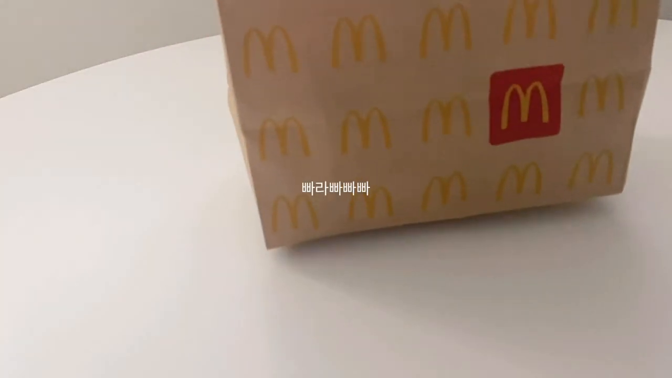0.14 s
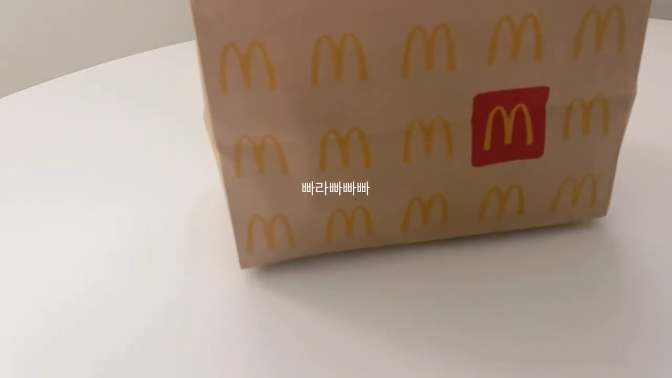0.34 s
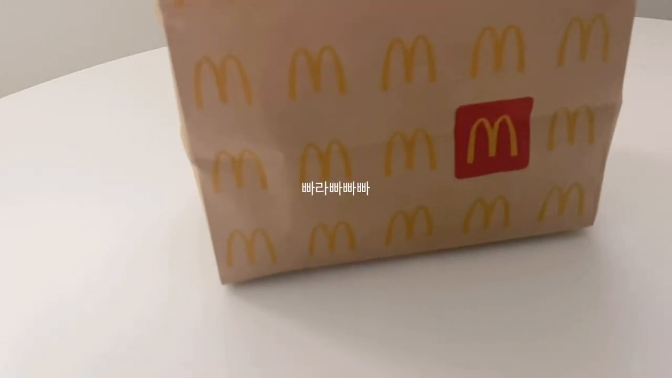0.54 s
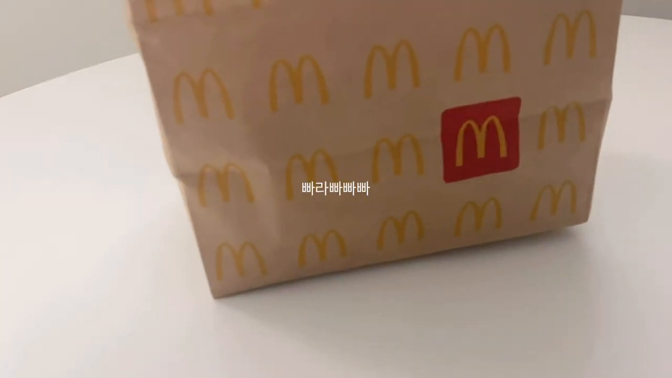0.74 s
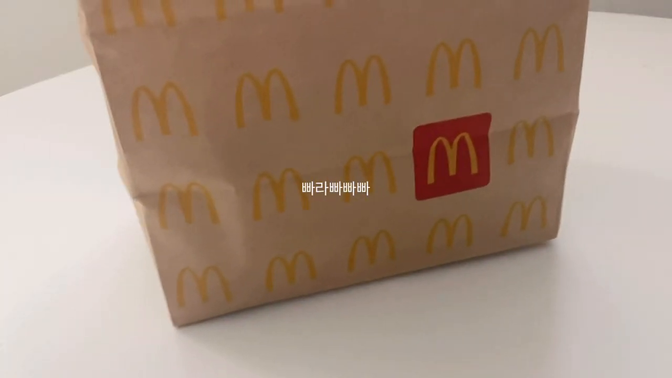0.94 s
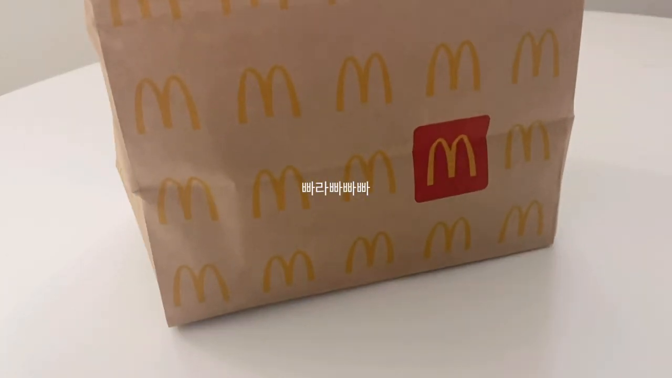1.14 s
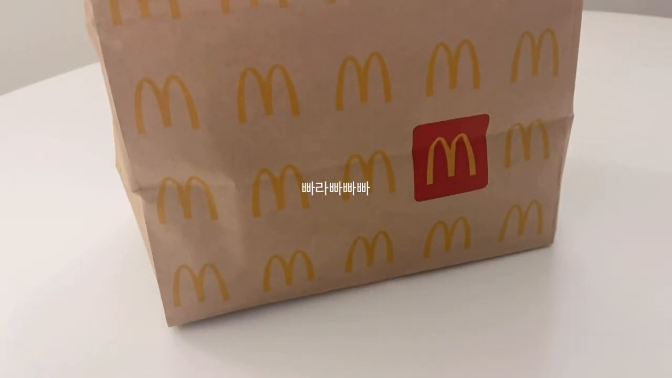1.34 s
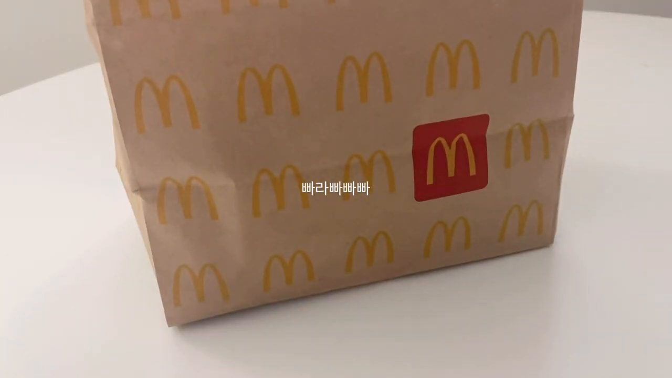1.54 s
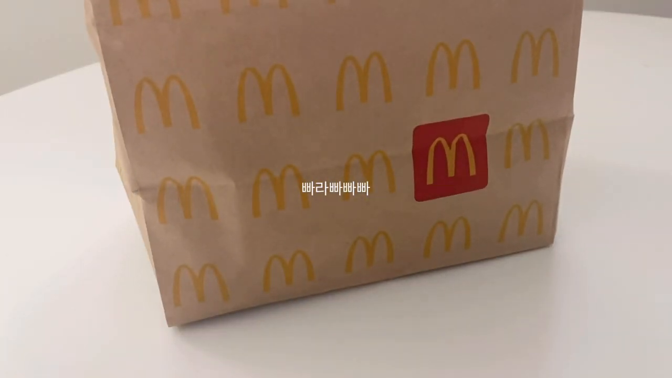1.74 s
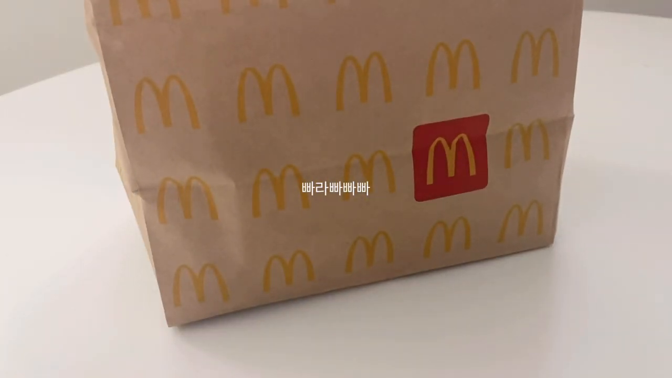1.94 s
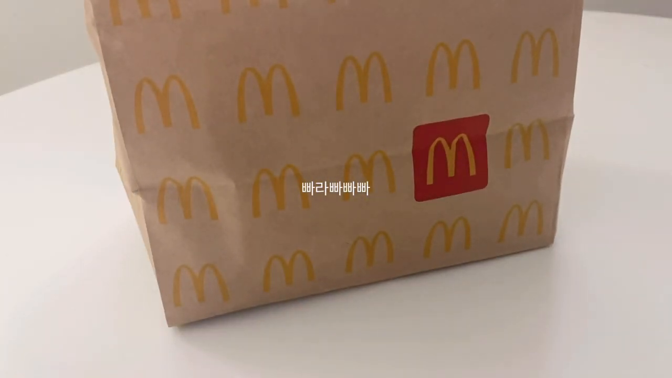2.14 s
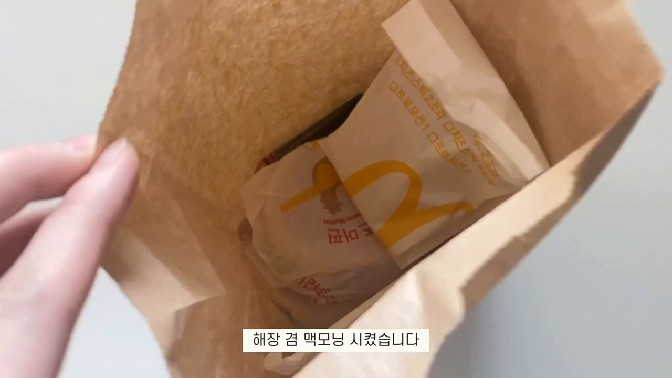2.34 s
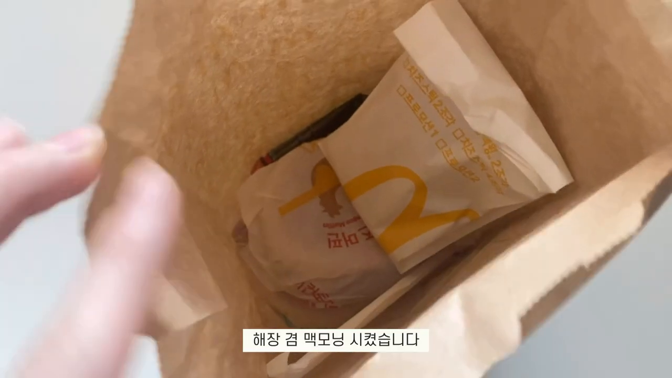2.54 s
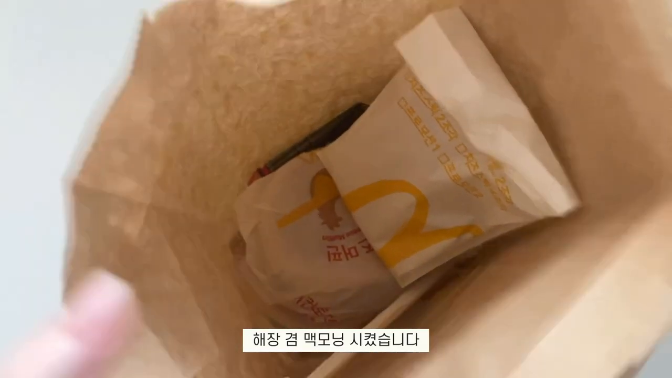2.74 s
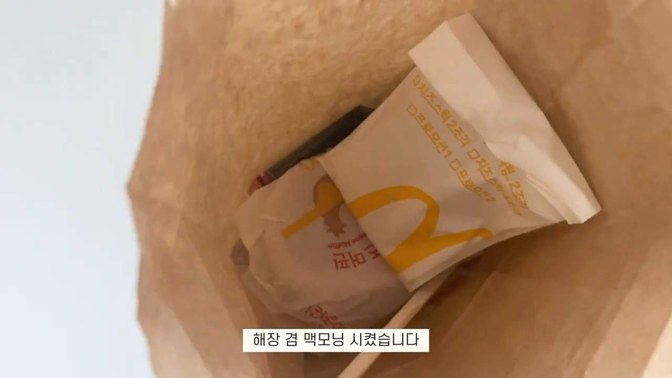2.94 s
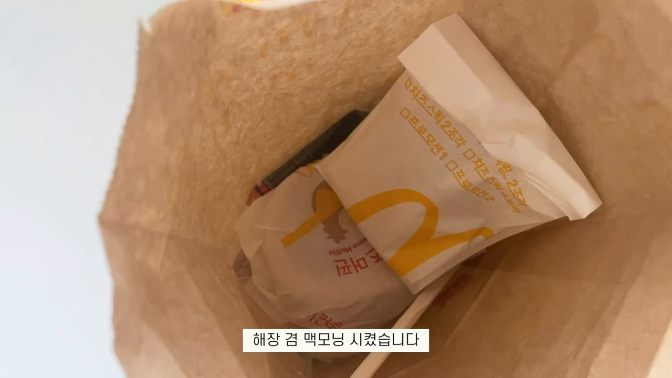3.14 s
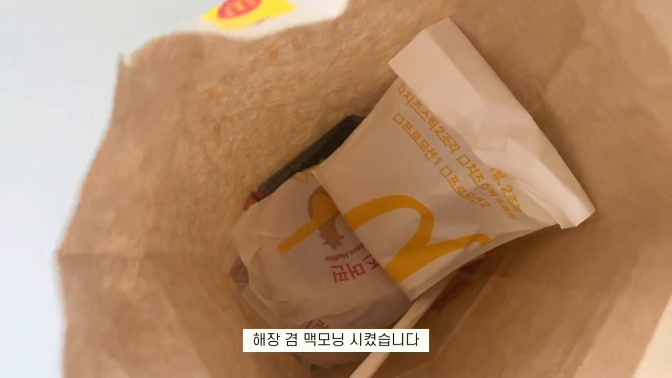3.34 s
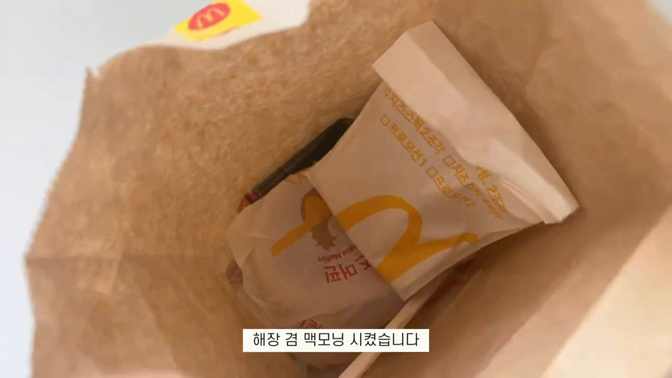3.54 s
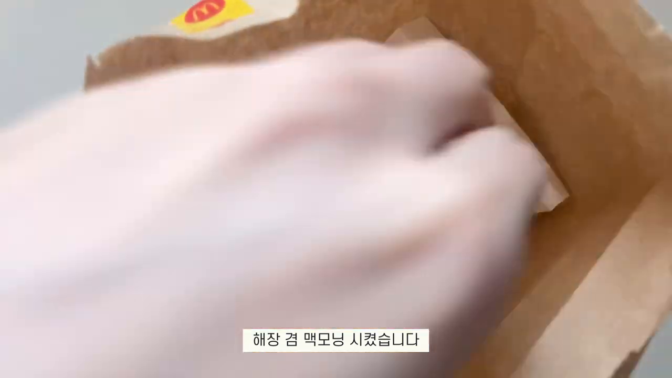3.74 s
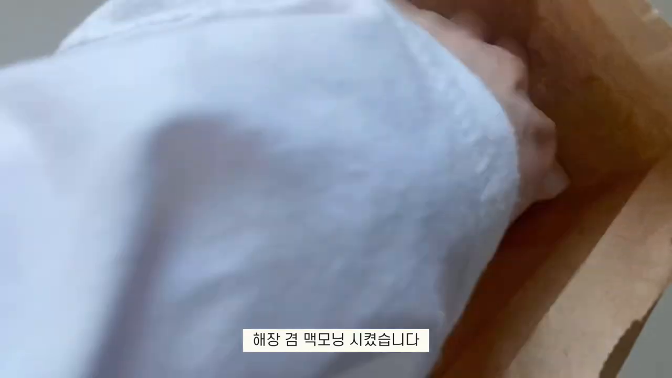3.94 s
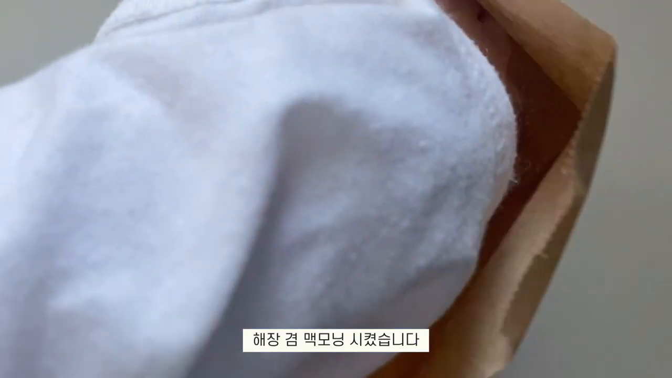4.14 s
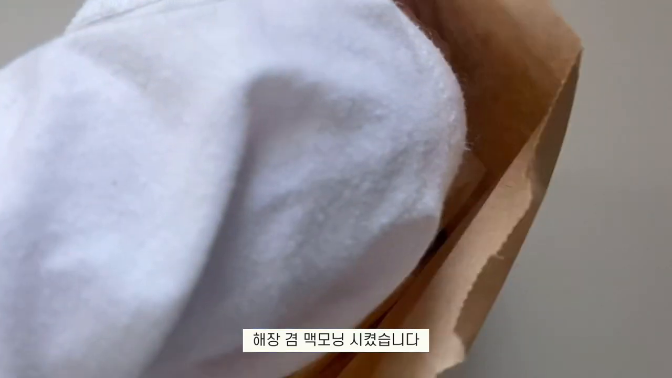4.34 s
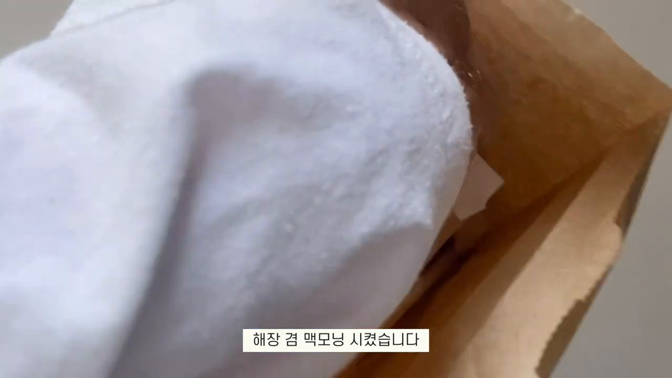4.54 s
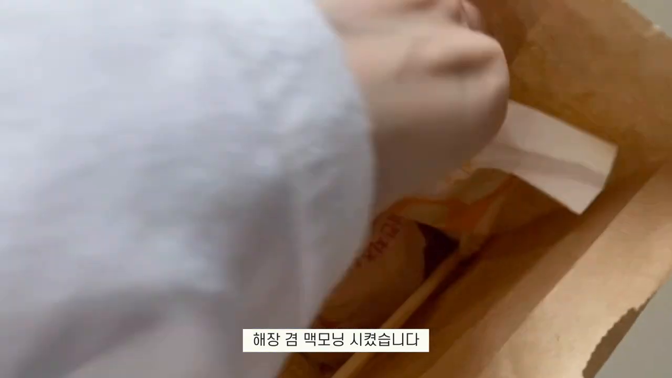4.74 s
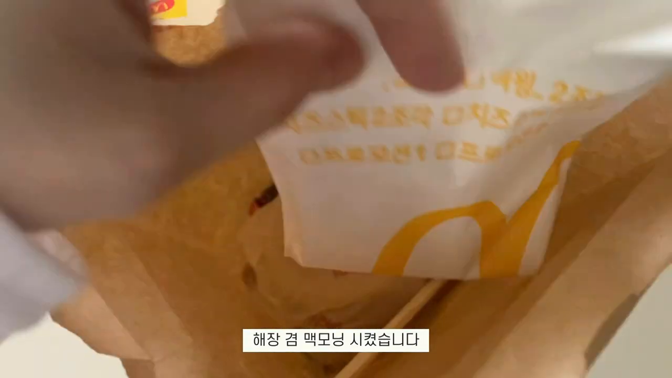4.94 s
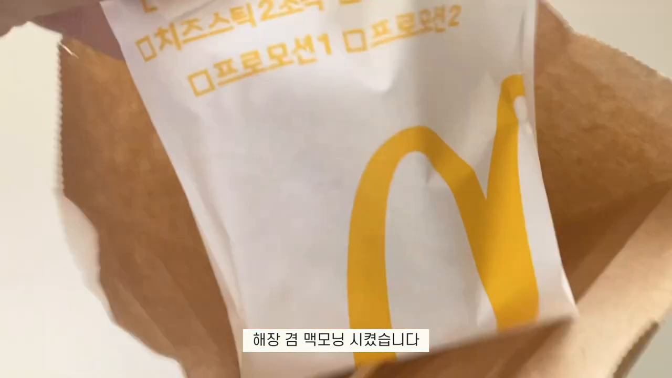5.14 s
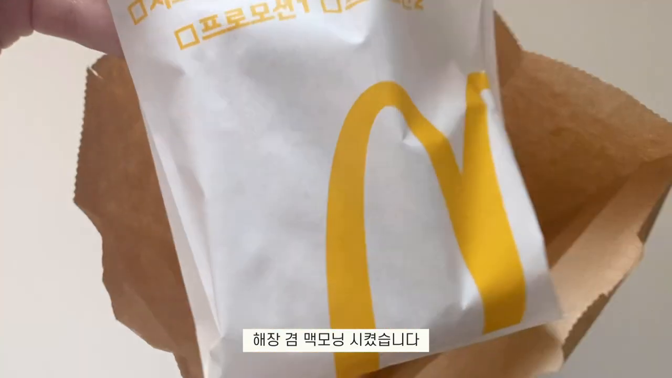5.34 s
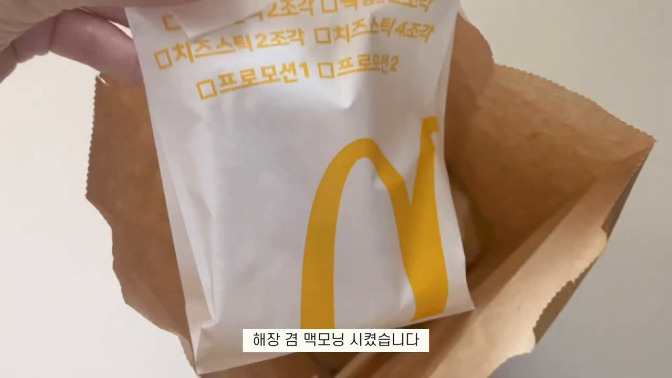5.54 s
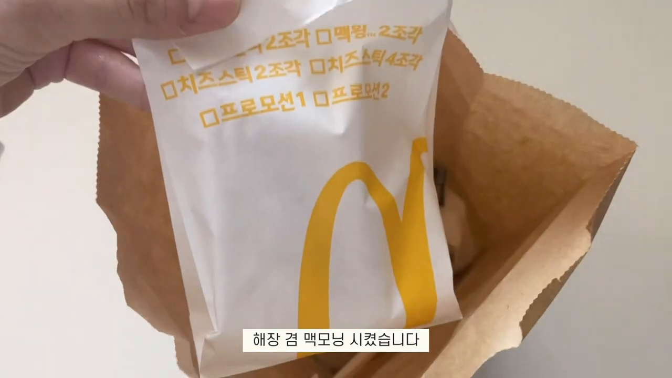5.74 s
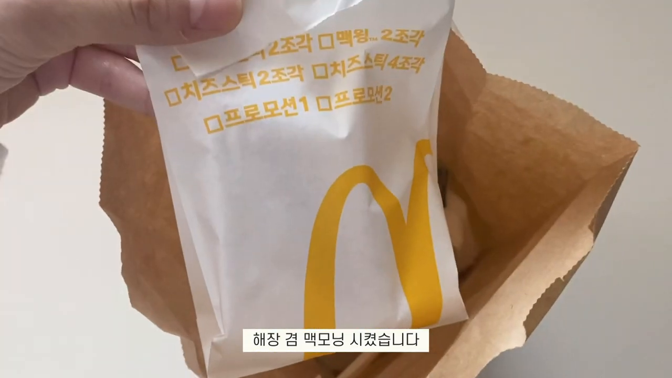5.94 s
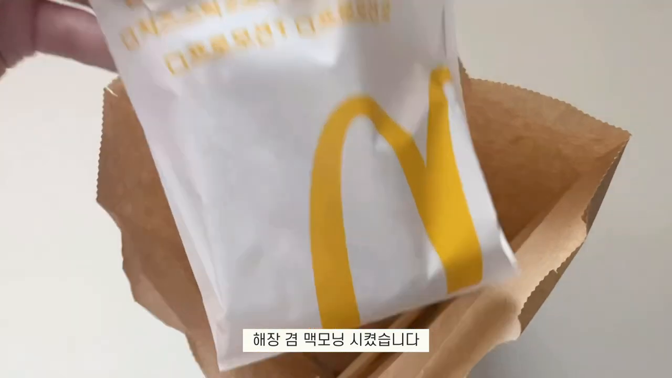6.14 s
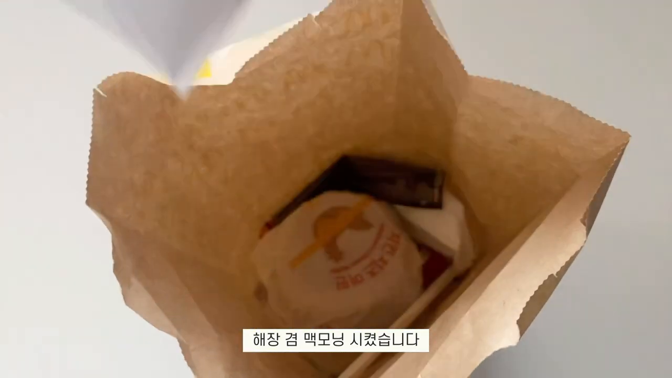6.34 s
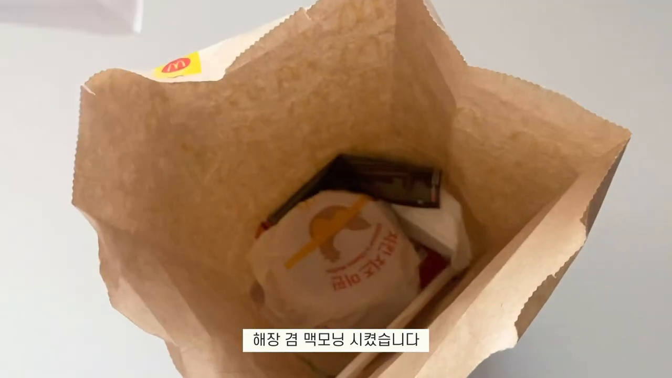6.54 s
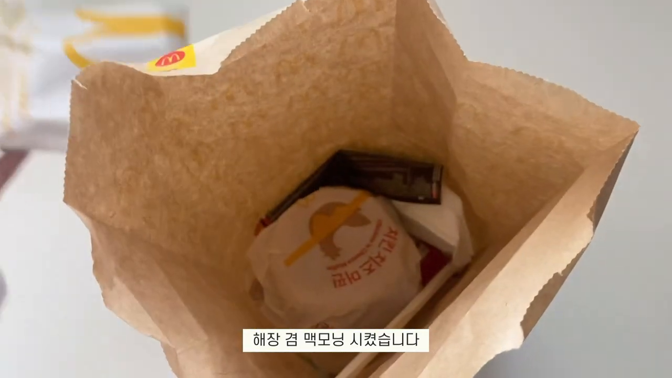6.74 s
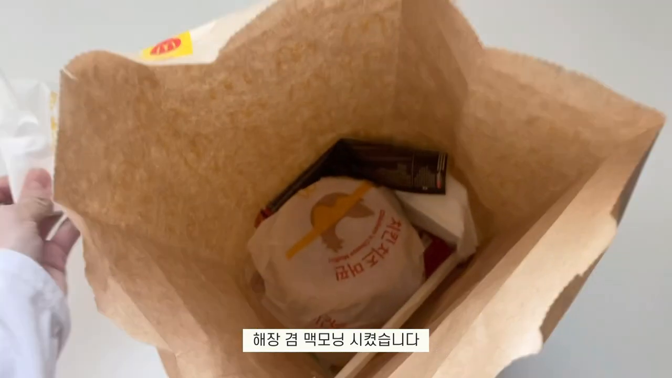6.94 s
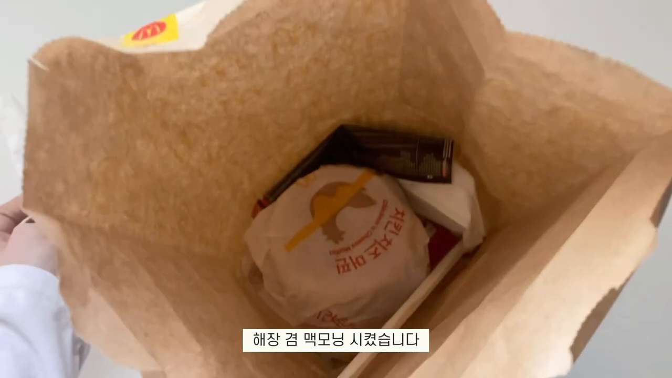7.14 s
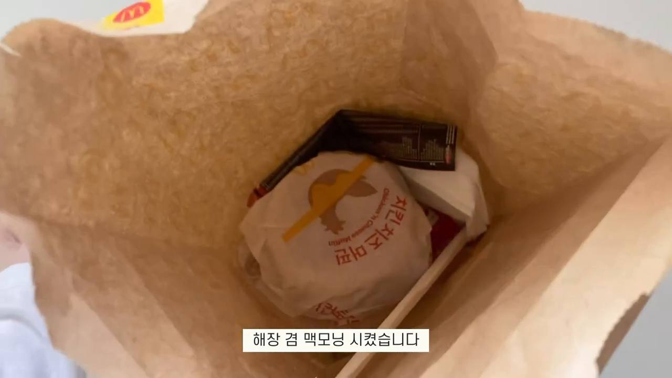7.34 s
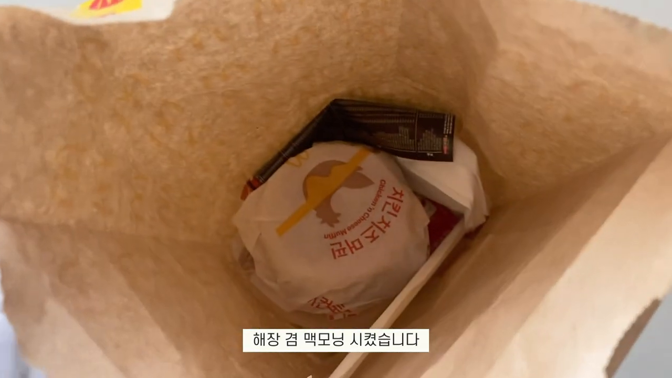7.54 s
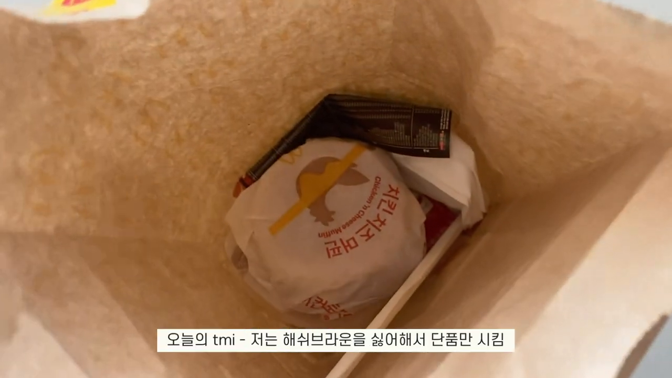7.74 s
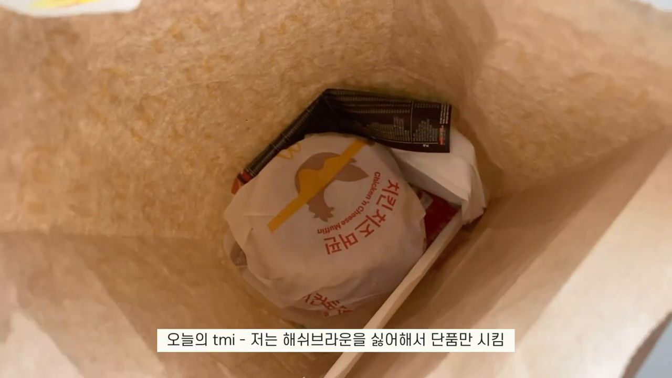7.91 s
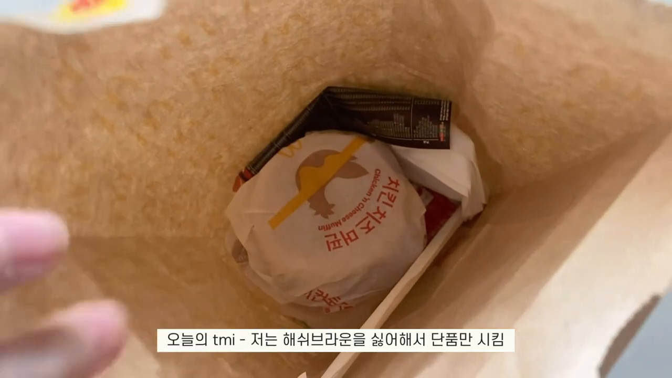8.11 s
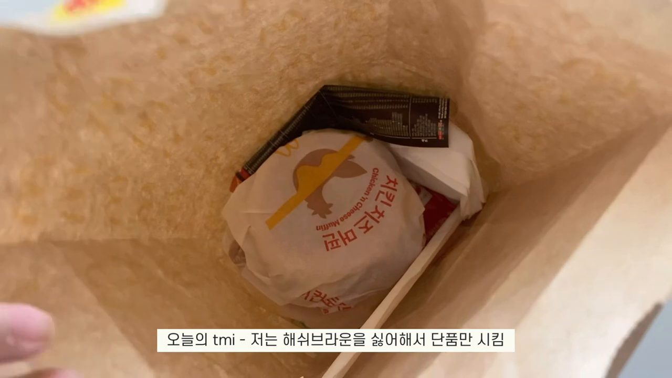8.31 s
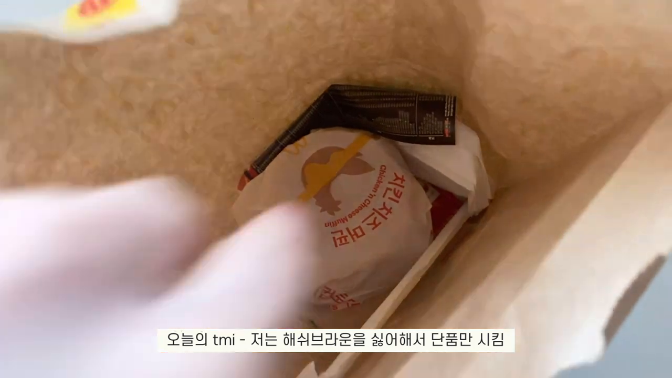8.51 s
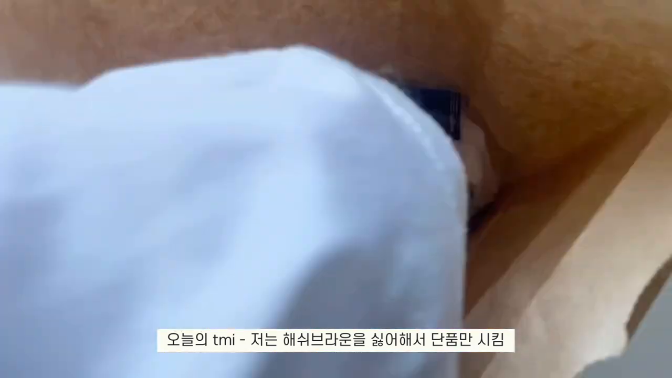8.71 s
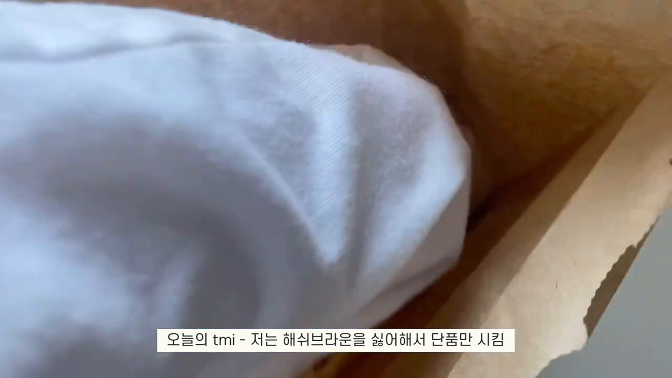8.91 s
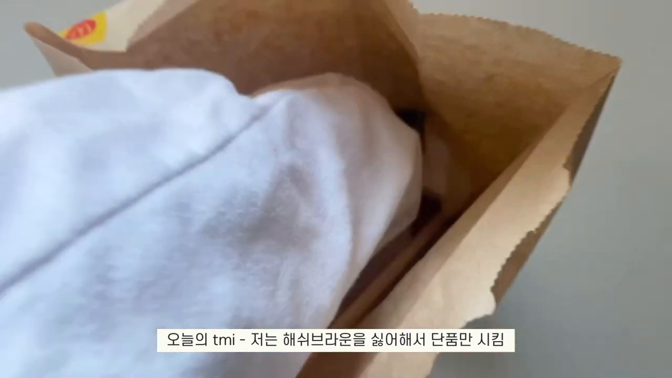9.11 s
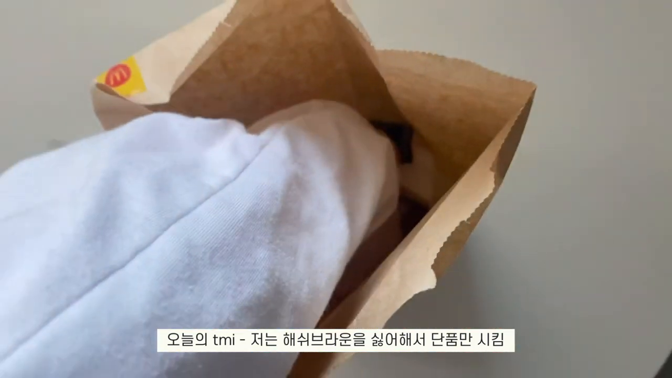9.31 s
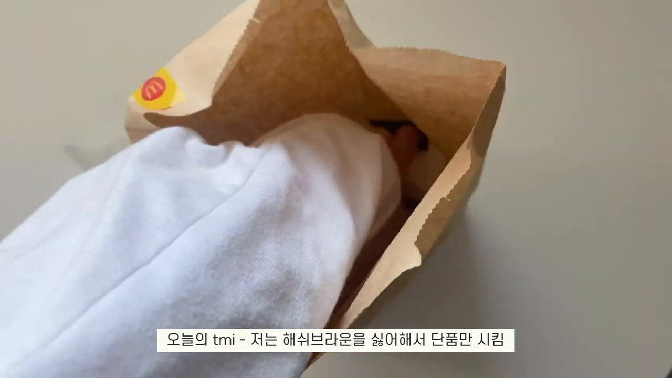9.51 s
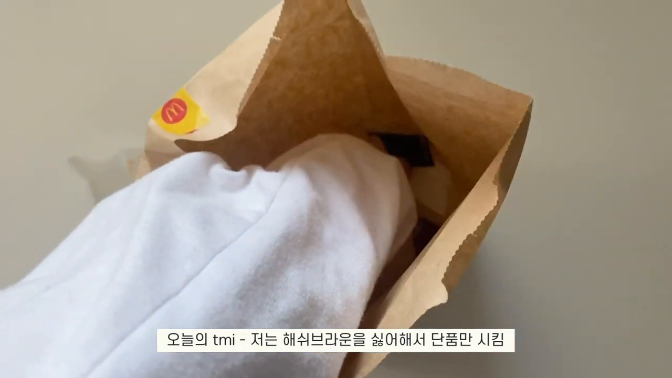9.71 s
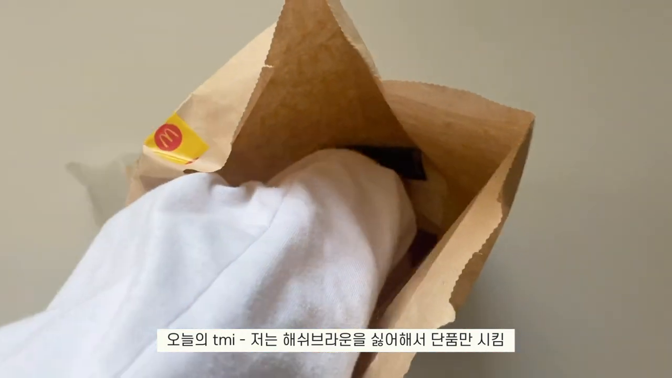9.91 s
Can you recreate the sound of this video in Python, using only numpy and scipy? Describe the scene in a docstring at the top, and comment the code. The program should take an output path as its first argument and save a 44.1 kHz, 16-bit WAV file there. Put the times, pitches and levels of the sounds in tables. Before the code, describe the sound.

A paper takeout bag knocks down on a table, then is pulled open and rummaged through in uneven bursts of crisp crackle and rustle.

```python
"""A paper takeout bag is set down and slid on a table: low knocks and a paper hiss over a faint rumble.
From about 2 s it is pulled open and a hand digs in: creases snap over fine crinkle and sleeve rub, panels thud.
Near 5 s a wrapped item drags out, hissing and ringing; then fainter rustles, and more creasing to the end.
Snaps, rubs and slides are shaped noise coloured by the paper; panel pops are short sines of falling pitch.
A phone's stereo pair hears it from close above, in a small, quiet room."""
import sys
import numpy as np
from scipy import signal
from scipy.fft import rfft, irfft, next_fast_len
from scipy.io import wavfile
from scipy.ndimage import uniform_filter1d, map_coordinates

SR = 44100
rng = np.random.default_rng(int(sys.argv[2]) if len(sys.argv) > 2 else 0)


def wav_record(signal):
    """Record a signal, one row per channel, as 16-bit PCM in the file named by sys.argv[1]."""
    frames = np.transpose(np.atleast_2d(signal))
    bounded = np.clip(frames, -1, 1)
    # unit amplitude maps onto the largest positive 16-bit level
    quanta = np.round(bounded * 32767).astype(np.int16)
    wavfile.write(sys.argv[1], SR, quanta)


N = 439677

# Relative spectra of fibre fizz, the bag's thud and rubbing paper: freq_hz, level_db [per Hz]
FIZZ_SPECTRUM = [(5000, -12.5), (8000, -2), (10500, -5.5), (12500, -6.5), (15500, -12), (17000, -40)]
THUD_SPECTRUM = [(40, -24), (110, -1), (230, -2), (380, -4.5), (560, -8.5), (850, -2), (1400, -7.5),
                 (3000, -40.5)]
RUB_SPECTRUM = [(100, -24), (200, -0.5), (370, 0), (600, -1.5), (950, -1.5), (1500, -1.5), (3000, -32.5)]
# How alike left and right are at the microphones: freq_hz, likeness [0 to 1]
LIKENESS = [(150, .97), (600, .85), (2000, .62), (6500, .65), (8500, .9), (11000, .96)]
# Moves of the hand on the paper, levels before each layer's trim:
# start_s, length_s, crinkle_db, rub_db, hiss_db
HAND_MOVES = [(0.024, 0.15, -71, -59.5, -78), (0.197, 0.29, -59, -53, -89), (0.394, 0.085, -50, -47.5, -75),
              (0.725, 0.18, -49.5, -44.5, -58.5), (1.294, 0.055, -73.5, -72, -75.5),
              (2.273, 0.11, -52, -48, -57.5), (2.485, 0.026, -58.5, -55, -56),
              (2.529, 0.145, -36.5, -35, -52), (2.724, 0.079, -48.5, -60, -65),
              (2.828, 0.37, -68, -58.5, -73.5), (3.145, 0.13, -54.5, -53.5, -60),
              (3.308, 0.073, -53.5, -50, -64), (3.571, 0.13, -75, -63.5, -73.5),
              (3.697, 0.043, -49.5, -44, -50.5), (3.788, 0.18, -40.5, -39.5, -51),
              (4.022, 0.19, -43, -40, -59), (4.232, 0.242, -44.5, -44.5, -51),
              (4.515, 0.313, -43.5, -41, -44), (4.812, 0.12, -36, -35, -39.5), (4.973, 0.13, -46, -47, -52),
              (5.279, 0.13, -56, -50.5, -62.5), (6.079, 0.207, -64, -62.5, -76.5),
              (6.671, 0.38, -73, -72, -83), (6.993, 0.19, -61, -61.5, -76), (7.177, 0.018, -34.5, -52, -52),
              (7.205, 0.18, -53.5, -63, -64.5), (7.928, 0.068, -54, -44.5, -60),
              (8.078, 0.2, -51.5, -49.5, -54), (8.255, 0.083, -37.5, -35.5, -53.5),
              (8.382, 0.077, -51, -44.5, -51.5), (8.47, 0.38, -58.5, -54.5, -68),
              (8.604, 0.13, -56.5, -50, -55.5), (8.828, 0.33, -50, -49, -58), (9.203, 0.19, -45, -45, -53),
              (9.39, 0.38, -55, -52.5, -63), (9.532, 0.12, -46.5, -42.5, -55),
              (9.734, 0.24, -48, -48, -49.5)]


def amp(db):
    """Decibels to amplitude."""
    return 10 ** (np.asarray(db) / 20)


def unit(x):
    """Scale to rms 1."""
    return x / np.sqrt(np.mean(x ** 2) + 1e-20)


def along(points, hz):
    """Read (Hz, value) points on a log frequency axis."""
    f, v = np.transpose(points)
    return np.interp(np.log(hz + 1), np.log(f + 1), v)


def curves(rows):
    """One value per sample for each column after the time."""
    s, *cols = np.transpose(rows)
    return [np.interp(np.arange(N) / SR, s, c) for c in cols]


def wobble(rate):
    """A smooth random curve, rate knots a second."""
    knots = rng.standard_normal(int(N * rate / SR) + 4)
    return map_coordinates(knots, [np.arange(N) * rate / SR], order=2)


def filtered(x, response):
    """x through a complex response of frequency."""
    n = x.shape[-1]
    m = next_fast_len(n + 2048)
    return irfft(rfft(x, m) * response(np.fft.rfftfreq(m, 1 / SR)), m)[..., :n]


def causal(gain):
    """The minimum-phase response of a gain: it rings only after the blow."""
    cepstrum = irfft(np.log(np.maximum(gain, 1e-6)))
    half = len(cepstrum) // 2
    cepstrum[1:half] *= 2
    cepstrum[half + 1:] = 0
    return np.exp(rfft(cepstrum))


def mid_side(likeness):
    """Gains of two unrelated signals whose sum and difference are this much alike."""
    turn = np.arccos(likeness) / 2
    return np.array([np.cos(turn), np.sin(turn)])


def paper(pair, spectrum, pitch_hz=3000, ring_db=0, octaves=0.27, ripple_db=0):
    """Two unrelated excitations become left and right of rms 1, coloured by the sheet and one ringing facet."""
    def response(hz):
        facet_db = ring_db / (1 + (np.log2((hz + 1) / pitch_hz) / octaves) ** 2)
        # lesser modes: random levels at knots about 250 Hz apart
        modes_db = ripple_db * np.interp(hz, np.linspace(0, SR / 2, 90), rng.standard_normal(90))
        colour = causal(amp(along(spectrum, hz) + facet_db + modes_db))
        return colour * mid_side(np.clip(along(LIKENESS, hz), -1, 1))
    mid, side = filtered(pair, response)
    return unit(np.array([mid + side, mid - side]))


def panned(x, balance_db):
    """Shift a stereo sound towards the left by a level difference."""
    return x * amp(np.array([[.5], [-.5]]) * balance_db)


def add(track, s, sound):
    """Mix a sound into the track at time s."""
    part = track[:, max(round(s * SR), 0):][:, :sound.shape[1]]
    part += sound[:, :part.shape[1]]


def swell(s, length, attack, release, arch_db):
    """The gain of one move: a rise and fall of 60 dB per attack or release time, around an arched hold."""
    age = np.arange(N) / SR - s
    arch = (2 * np.clip(age / length, 0, 1) - 1) ** 2  # the ends lie under the middle
    outside = np.maximum(-age, 0) / attack + np.maximum(age - length, 0) / release
    return amp(-arch_db * arch - 60 * np.minimum(outside, 2))


def shifting(depth_db):
    """Noise whose colour changes from moment to moment, as ever new facets take the load."""
    z = signal.stft(rng.standard_normal((2, N)), nperseg=256)[2]
    field = rng.standard_normal(z.shape[1:])
    field = uniform_filter1d(field, size=4, axis=0)  # across frequency
    field = uniform_filter1d(field, size=7, axis=1)  # across time
    return unit(signal.istft(z * amp(depth_db * unit(field)), nperseg=256)[1][:, :N])


FACET_HZ = 2950  # facet pitch at which a crack keeps its plain colour


def buckle(db, thud_db, fizz_db, spread, pitch_hz, body, ring_db, thud_t60, bag_db, bag_t60):
    """A short avalanche of fibre slips; it echoes between the bag's walls and shakes the panel."""
    # Relative spectrum of a crack before its facet's tilt: freq_hz, level_db [per Hz]
    crack_spectrum = [(400, -28), (1300, 0.5), (2600, -1.5), (4000, -4.5), (7000, -10.5), (8500, -19.5),
                      (12000, -51)]
    tilt_db_per_octave = 2  # a facet an octave higher brightens the crack by this slope
    t = np.arange(4096) / SR

    def noise():
        return rng.standard_normal((2, len(t)))

    slips = amp(4 * np.repeat(rng.standard_normal(len(t) // 16), 16))
    age = t / max(spread, .0007)
    build = 1 - np.exp(-age / 0.059)
    # the crease gives way, then its neighbours follow
    first_flip = unit(np.exp(-t / 0.00036))
    neighbours = unit(slips * build * np.exp(-(age / 2.1) ** 1.5))
    avalanche = unit(neighbours + 0.9 * first_flip)
    bag_echo = unit(build * amp(-60 * t / bag_t60))
    force = unit(avalanche + amp(bag_db) * bag_echo)

    tilt_db = tilt_db_per_octave * np.log2(pitch_hz / FACET_HZ)
    colour = [(hz, level + tilt_db * np.log2(hz / FACET_HZ)) for hz, level in crack_spectrum]
    crack = paper(force * noise(), colour, pitch_hz, ring_db, ripple_db=3)
    fizz = paper(unit(avalanche + .4 * force) * noise(), FIZZ_SPECTRUM, ripple_db=2.5)
    panel_decay = unit(build * amp(-60 * t / thud_t60))
    thud = paper((avalanche + 5.1 * panel_decay) * noise(), body, ripple_db=3.5)
    energy = np.sqrt(.01 * SR / len(t))  # the crack's level is rms over 10 ms
    return energy * amp(db) * (crack + amp(fizz_db) * fizz + amp(thud_db) * thud)


def slide(stroke, spectrum, pitch_hz):
    """Smooth paper slides uncreased; friction hisses in the resonances and sings faintly at one pitch."""
    slide_db, = curves(stroke)
    t = np.arange(N) / SR
    sliding = (t > stroke[0][0]) & (t < stroke[-1][0])
    hiss = paper(shifting(depth_db=3.0), spectrum, pitch_hz, ring_db=4, octaves=0.025, ripple_db=1.5)
    return sliding * amp(slide_db + 0.8 * wobble(69)) * hiss


def room_tone():
    """A steady low rumble of the building, a little to the right."""
    # Relative spectrum of the rumble: freq_hz, level_db [per Hz]
    rumble_spectrum = [(20, -31), (58, 4), (100, -6), (150, -8), (190, 0), (235, -7.5), (400, -16.5),
                       (600, -28.5), (2000, -39), (16000, -53.5)]
    return amp(-60) * panned(paper(rng.standard_normal((2, N)), rumble_spectrum), balance_db=-6.0)


def panels():
    """The bag's broad sides pump air as they bend: low noise that swells with each bend."""
    # Bends of a big panel: start_s, length_s, level_db
    bends = [(.01, 0.031, -48.5), (0.793, 0.092, -43.5), (2.333, .04, -47), (2.538, 0.14, -32),
             (3.34, 0.037, -38), (3.701, 0.31, -50.5), (4.102, 0.12, -46), (4.463, 0.083, -50),
             (4.824, 0.049, -39), (4.971, 0.12, -47), (5.282, 0.093, -58), (7.923, 0.091, -43.5),
             (8.135, 0.32, -45.5), (8.28, 0.035, -37), (8.624, 0.067, -46)]
    # Relative spectrum of the pumped air: freq_hz, level_db [per Hz]
    flex_spectrum = [(20, -36), (45, 1.5), (70, 1.5), (125, 1), (230, -9), (700, -56)]
    bend = sum(amp(db) * swell(s, length, attack=0.048, release=0.33, arch_db=3) for s, length, db in bends)
    return bend * paper(rng.standard_normal((2, N)), flex_spectrum, pitch_hz=76.4, ring_db=1, octaves=.2)


def table_push():
    """The bag is pushed along the table top: a scraping hiss with a weaker, lower rub under it."""
    # Level of the push before its random wobble: time_s, level_db
    push_curve = [(0.02, -72), (0.06, -61), (0.22, -59), (0.42, -77), (0.5, -62), (0.62, -50.5),
                  (0.72, -56.5), (0.78, -85)]
    # Relative spectrum of the scrape: freq_hz, level_db [per Hz]
    scrape_spectrum = [(250, -1), (750, -0.5), (2300, -5), (3900, 0), (5500, -8), (8000, -4.5),
                       (10500, -5.5), (16000, -14)]
    scrape = slide(push_curve, scrape_spectrum, pitch_hz=3940)
    return scrape + amp(-19) * slide(push_curve, RUB_SPECTRUM, pitch_hz=383)


def crackle(rate, scatter_db, life):
    """Random tiny buckles, rate a second: many faint, a few strong, amplitude dying by 1/e in life seconds."""
    happens = rng.random(N) < rate / SR
    hits = happens * amp(scatter_db * np.minimum(rng.exponential(size=N), 3.5))
    power = signal.lfilter([1], [1, -np.exp(-2 / (life * SR))], hits ** 2)
    return unit(np.sqrt(np.abs(power)))


def handling():
    """Paper creases and rubs: smooth friction plus crinkles that come thicker as the hand works harder."""
    # Relative spectrum of fine crinkle: freq_hz, level_db [per Hz]
    crinkle_spectrum = [(500, -23.5), (1400, -5.5), (2200, -1.5), (3100, -3), (4500, -4), (7000, -12.5),
                        (8500, -12), (12000, -41.5)]
    power = np.zeros((3, N))
    for s, length, *levels_db in HAND_MOVES:
        gain = swell(s, length, attack=0.031, release=0.23, arch_db=2.5)
        power += np.outer(amp(levels_db) ** 2, gain ** 2)
    creasing, rubbing, hissing = np.sqrt(power)
    effort = (creasing / creasing.max()) ** 0.063
    grains = crackle(550 * effort, scatter_db=5.0, life=0.0031) / np.maximum(effort, .1) ** 0.19
    grip = amp(2.48 * wobble(45))  # the hand catches and lets go
    texture = unit(grip * np.hypot(unit(grains), .65))
    crinkle = amp(-1.5) * creasing * paper(texture * shifting(depth_db=1.0), crinkle_spectrum)
    hiss = amp(2.0) * hissing * paper(np.hypot(texture, .4) * shifting(depth_db=3.5), FIZZ_SPECTRUM)
    # the soft sleeve drags evenly, so the bag's hollow answers with little grain
    drag = np.hypot(texture, 1) * shifting(depth_db=5)
    rub = amp(-1.0) * rubbing * paper(drag, RUB_SPECTRUM, pitch_hz=359, ring_db=1.0, octaves=0.079)
    return crinkle + hiss + rub


def folds():
    """Small creases give way at random while the hand moves, each with its own size and pitch."""
    folds_per_s, fold_db, fold_hz = 11, -4, 2150  # level against the move's crinkle; middle pitch
    track = np.zeros((2, N))
    for s, length, crinkle_db, rub_db, hiss_db in HAND_MOVES:
        for when, strength, pitch in rng.random((round(folds_per_s * length), 3)):
            db = crinkle_db + fold_db + 8 * (strength - .5)
            pitch_hz = fold_hz * 2 ** (2.4 * (pitch - .5))
            fold = buckle(db, thud_db=-5, fizz_db=-17.0, spread=0.0057, pitch_hz=pitch_hz, body=THUD_SPECTRUM,
                          ring_db=17.0, thud_t60=0.034, bag_db=-5.5, bag_t60=0.099)
            add(track, s + when * length, fold)
    return track


def landings():
    """The loaded base touches the table corner by corner, with a hollow knock."""
    # Touches, thud against crack, spread at least 0.7 ms in use: start_s, level_db, thud_db, spread_s
    touches = [(0.251, -63, 14, 0.0037), (0.3364, -50.5, -0.5, 0.00083), (0.3844, -54.5, 14, .0076),
               (.4112, -46, -8, 0.0079), (0.4503, -35, -0.5, 0.0049), (0.7507, -42, 8.5, 0.001),
               (0.7964, -39, 0, 0.015), (0.8126, -35.5, 2, 0.0057), (0.8363, -41.5, 8.5, 0.018),
               (0.8725, -35.5, -3, 0.002), (3.312, -43, -9.5, 0.0031), (3.353, -46.5, 6, 0.0043)]
    # Relative spectrum of the hollow knock: freq_hz, level_db [per Hz]
    knock_spectrum = [(50, -2.5), (450, 5), (780, 8.5), (1300, -5.5), (3000, -28)]
    track = np.zeros((2, N))
    for s, db, thud_db, spread in touches:
        knock = buckle(db, thud_db, fizz_db=-4.5, spread=spread, pitch_hz=1550, body=knock_spectrum,
                       ring_db=1.0, thud_t60=0.05, bag_db=-21, bag_t60=0.0496)
        add(track, s, knock)
    return track


def pops():
    """A panel that flips drums briefly; its pitch sags as the tension lets go."""
    # Panel flips, before the 6 dB lift and the pitch glide below: start_s, level_db, pitch_hz
    flips = [(0.454, -34, 400), (4.935, -24, 357), (5.124, -31.5, 371), (8.317, -23, 267)]
    track = np.zeros((2, N))
    t = np.arange(SR // 8) / SR
    for s, db, pitch_hz in flips:
        glide_hz = pitch_hz * (0.97 + 0.35 * np.exp(-t / 0.0041))
        drum = np.sin(2 * np.pi * np.cumsum(glide_hz) / SR) * (1 - np.exp(-t / 0.0011))
        add(track, s, np.tile(amp(db + 6.0 - 60 * t / 0.052) * drum, (2, 1)))
    return track


def snaps():
    """Creases flip one at a time, each facet with its own pitch; small, high facets shake the panel less."""
    # Creases, fizz against crack, spread at least 0.7 ms in use: start_s, level_db, fizz_db, spread_s, pitch_hz
    creases = [(1.373, -55, -32, .0014, 1350), (1.4242, -60, -5, 0.00062, 6200),
               (2.2733, -46.5, -27, 0.002, 2680), (2.3392, -45, 5, 0.0037, 7850),
               (2.5311, -29, 6, 0.0017, 5300), (2.5667, -36.5, 10.5, 0.0032, 7300),
               (2.5782, -32.5, 7.5, 0.0024, 5900), (2.6036, -32, -1, 0.00099, 5130),
               (2.6184, -36, 1.5, 0.0026, 3780), (2.6527, -29.5, -3.5, 0.0039, 4130),
               (2.6677, -30.5, -6, 0.0045, 3220), (2.7267, -41, -6, 0.0017, 3800),
               (2.7506, -37, -9, 0.0021, 3500), (2.781, -31.5, -2.5, 0.0028, 3800),
               (2.91, -42, -27, 0.00089, 3580), (2.997, -50, 1.5, 0.0022, 2550),
               (3.1967, -42.5, -31, 0.0017, 3900), (3.214, -46, -1, 0.0018, 2540),
               (3.7055, -40.5, -1, 0.0038, 4960), (3.817, -35.5, 3, 0.0021, 1440),
               (3.8706, -33, -0.5, .002, 7000), (3.881, -38, 11.5, 0.0022, 2680),
               (3.9377, -34.5, -5.5, 0.0011, 1350), (4.088, -38, -7, 0.0099, 1240),
               (4.1023, -30, -0.5, 0.0036, 3670), (4.1134, -30.5, -1, 0.0023, 6600),
               (4.1736, -31.5, -1.5, 0.0043, 3730), (4.246, -43, 2, 0.0016, 4000),
               (4.255, -36, -7, .0014, 2660), (4.341, -33.5, 1, 0.0013, 5200),
               (4.382, -41.5, 1, 0.0023, 3100), (4.4173, -43.5, -2, 0.0011, 4290),
               (4.4525, -41, -5, 0.0024, 1290), (4.5305, -39.5, 0, .004, 3650),
               (4.5545, -41, -4, 0.0018, 4570), (4.617, -34.5, -17, 0.0025, 3530),
               (4.746, -38, 5, 0.00083, 4070), (4.7642, -27.5, -3.5, 0.0027, 2700),
               (4.8287, -34.5, -11, 0.0052, 3000), (4.8373, -27, -0.5, 0.0016, 6100),
               (4.8646, -39.5, 2, .002, 3660), (4.8983, -30.5, 5, 0.0015, 5200),
               (4.913, -24.5, 4, 0.0038, 2170), (4.9296, -25.5, -7, 0.001, 3870),
               (4.9331, -20.5, -0.5, 0.0013, 5670), (5.043, -32.5, -17, 0.00082, 3120),
               (5.0896, -37, -12, 0.00062, 4230), (5.1219, -27, -19, 0.0011, 2800),
               (5.1237, -27.5, -1.5, 0.0023, 4400), (5.264, -44.5, -9, 0.0018, 2370),
               (5.5424, -31, -3, 0.0012, 5850), (5.99, -52, -36, 0.00051, 2340),
               (6.043, -60, -1.5, 0.0032, 1400), (6.092, -52.5, -39, 0.00096, 1490),
               (6.127, -43, -9.5, 0.0025, 2100), (6.217, -48.5, -18, 0.0012, 2680),
               (6.3515, -44.5, -22, 0.0059, 1517), (6.407, -72.5, 12, 0.0048, 6310),
               (6.7128, -60.5, -29.5, 0.0012, 1400), (6.753, -63, -30.5, 0.0029, 1150),
               (6.7816, -64, 0.5, 0.0022, 2200), (6.8775, -65, -9, 0.0022, 3470),
               (6.9815, -56.5, -17, .002, 1290), (7.0071, -50, -12, 0.0037, 1400),
               (7.0578, -57.5, -16, .002, 2200), (7.1221, -58, -7, .0015, 2400),
               (7.163, -48.5, -13, 0.0067, 1200), (7.18, -40, 2, 0.012, 2300),
               (7.2009, -40.5, -13, 0.0012, 3680), (7.2529, -38.5, -14.5, 0.003, 2350),
               (7.3884, -49.5, -9, 0.0042, 2300), (7.5225, -48, -37.5, 0.0036, 2040),
               (7.806, -55.5, -33.5, 0.0078, 3220), (8.1334, -41.5, -1.5, 0.00065, 1830),
               (8.2621, -31, -13, 0.0035, 2800), (8.2752, -36.5, 0.5, 0.0014, 3300),
               (8.3133, -29.5, 0.5, 0.0088, 4600), (8.3238, -30, -21, 0.00059, 2620),
               (8.4482, -36.5, -16, 0.0085, 1860), (8.594, -40, -0.5, 0.0038, 4400),
               (8.8267, -36, 3.5, 0.0018, 2380), (9.07, -47, -20, 0.0061, 900),
               (9.228, -41, -5, 0.0029, 4860), (9.3306, -33.5, -3.5, 0.0024, 3520),
               (9.5347, -40, -30, 0.0078, 3840), (9.546, -37.5, -10, 0.0015, 1270),
               (9.6207, -39, -25, 0.004, 2530), (9.844, -36.5, -9, 0.01, 3080)]
    track = np.zeros((2, N))
    for s, db, fizz_db, spread, pitch_hz in creases:
        thud_db = -6 - 4 * np.log2(pitch_hz / FACET_HZ)  # falls 4 dB per octave
        snap = buckle(db, thud_db, fizz_db, spread, pitch_hz, THUD_SPECTRUM,
                      ring_db=9.0, thud_t60=0.047, bag_db=-8.5, bag_t60=0.087)
        add(track, s, snap)
    return track


def wrapper():
    """The thin pouch drags free of the bag, then slides in the fingers; a weak pull mostly makes it ring."""
    # Drag past the bag's wall, then the slide in two strokes, before wobble: time_s, level_db
    lift_curve = [(5.14, -56), (5.25, -55), (5.295, -47), (5.42, -78)]
    pull_curve = [(5.41, -74), (5.45, -63.5), (5.53, -53.5), (5.56, -52), (5.63, -50.5), (5.69, -73.5),
                  (5.74, -53.5), (5.83, -45), (5.91, -41), (5.97, -80)]
    # Relative spectra of the drag and of the slide: freq_hz, level_db [per Hz]
    drag_spectrum = [(1500, -22), (2400, -4), (3900, -7), (4900, -12.5), (5900, -5.5), (7200, -9),
                     (16000, -15)]
    swish_spectrum = [(300, -1), (600, -2), (950, 7.5), (1750, 1.5), (2200, 0), (3600, 0.5), (4800, -9),
                      (5600, -4), (6400, -7), (7300, -10), (11000, -10.5), (16000, -22)]
    # The pouch's resonances: centre_hz, width_hz [at half amplitude], level_db [relative]
    resonances = [(2460, 100, -7), (2820, 140, 0.5), (3480, 300, -9)]
    # ring level at the reference pull; it grows more slowly than the hiss
    ring_db, ring_db_per_db, pull_ref_db = -61.5, 0.49, -43.5

    pull_db, = curves(pull_curve)
    t = np.arange(N) / SR
    pulled = (t > pull_curve[0][0]) & (t < pull_curve[-1][0])
    hz = np.arange(100, 16000, 25)
    modes = sum(amp(db) / (1 + (2 * (hz - centre) / width) ** 2) for centre, width, db in resonances)
    ring = paper(shifting(depth_db=7.0), np.column_stack([hz, 20 * np.log10(modes)]))
    ring = ring * pulled * amp(ring_db + ring_db_per_db * (pull_db - pull_ref_db))
    drag = slide(lift_curve, drag_spectrum, pitch_hz=3870)
    return drag + slide(pull_curve, swish_spectrum, pitch_hz=2897) + ring


def room(x):
    """The walls answer briefly: decaying noise, each frequency with its own decay time."""
    # Decay of the room: freq_hz, t60_s
    decay = [(500, .3), (4000, 0.067), (12000, 0.14)]
    hz, t, z = signal.stft(rng.standard_normal((2, SR // 3)), SR, nperseg=256)
    a, b = signal.istft(z * amp(-60 * t / along(decay, hz)[:, None]), SR, nperseg=256)[1]

    def answer(hz):
        level_db = along([(100, -14.0), (600, -17.0), (3000, -9.0), (10000, -15.0)], hz)
        # echoes arrive from all sides, so they are less alike
        return amp(level_db) * mid_side(along(LIKENESS, hz) ** 2)

    delayed = np.pad([a, b], ((0, 0), (round(0.0054 * SR), 0)))  # first echo after 5.4 ms
    mid, side = filtered(delayed / np.linalg.norm(a), answer)
    return signal.fftconvolve(x, np.array([mid + side, mid - side]), axes=1)[:, :N]


def scene():
    """The bag and its wrapper, placed where the hands work, in the room."""
    # Place of the hands: time_s, left_minus_right_db
    hand_place = [(0, 0), (4.3, -0.5), (5.2, 0.5), (5.9, 0), (6.5, -0.5), (9.97, -1)]
    place_db, = curves(hand_place)
    hands = panels() + table_push() + handling() + folds()
    bag = panned(hands + landings() + pops() + snaps() + wrapper(), place_db)
    return bag + room(bag) + room_tone()


def record(dry):
    """The phone's two microphones differ in phase and level; the top is cut steeply."""
    # Phase by which left leads right: freq_hz, lead_rad
    phase_lead = [(0, 0), (1030, 1.8), (2900, 7.2), (5100, 7.1), (6700, 5.8), (8100, 3.1), (10900, 0),
                  (13500, -3.1), (15600, -6.2)]
    # Level difference of the pair: freq_hz, left_minus_right_db
    pair_balance = [(250, .6), (600, 3), (4800, 3.2), (8500, 0)]
    top_hz = 16250  # half amplitude here

    def pair(hz):
        lead = np.interp(hz, *np.transpose(phase_lead))
        sides = np.array([[.5], [-.5]])
        return amp(sides * along(pair_balance, hz)) * np.exp(1j * sides * lead)

    return filtered(filtered(dry, pair), lambda hz: 1 / (1 + (hz / top_hz) ** 120))


dry = scene()
out = record(dry)
wav_record(out)
```